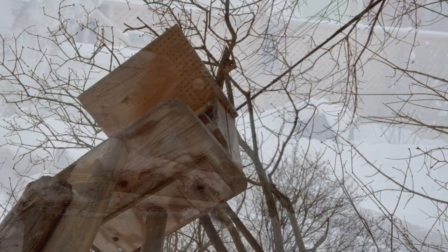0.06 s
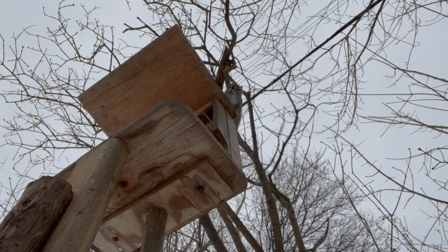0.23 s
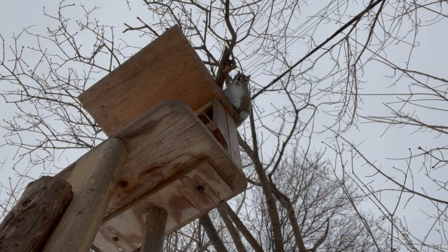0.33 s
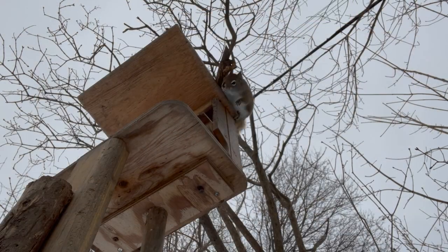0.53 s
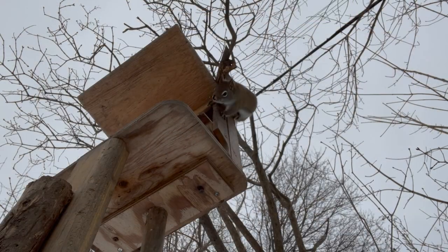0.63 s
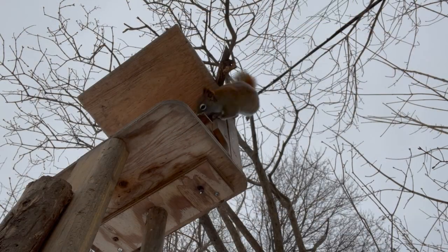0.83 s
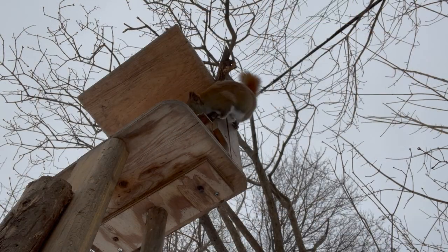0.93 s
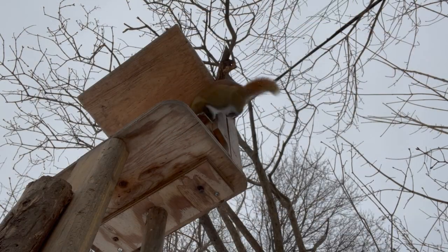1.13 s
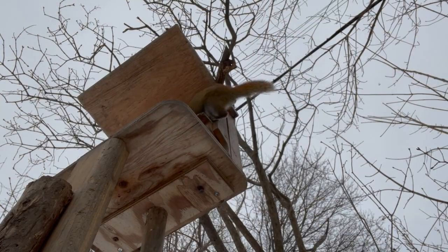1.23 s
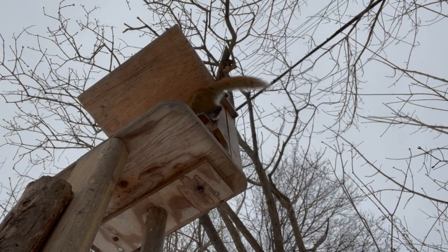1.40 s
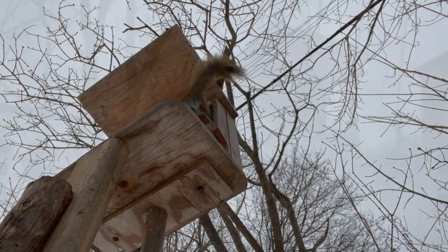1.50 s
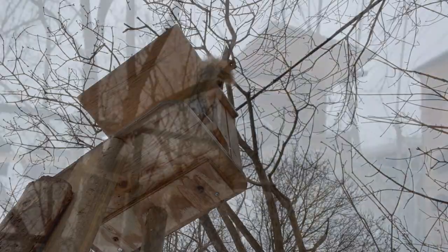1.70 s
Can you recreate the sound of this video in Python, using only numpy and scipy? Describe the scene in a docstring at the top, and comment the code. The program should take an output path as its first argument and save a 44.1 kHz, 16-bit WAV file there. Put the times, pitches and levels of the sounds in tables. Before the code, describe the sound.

A squirrel gives a sharp, high, slightly raspy squeak at 0.2 seconds, a softer one with a light knock at 0.6, and another sharp one at 0.8, each echoing faintly among trees. Its claws scratch lightly on a wooden box throughout, with a quick flurry around 1.2 seconds. A foot knocks hollowly on the boards at 1.5. A quiet distant rumble, hiss and faint hum continue underneath.

```python
"""Among bare trees, a squirrel on a wooden nest box gives two sharp squeaks with a softer one between.
The two sharp whistles leap up, hold and drop; the softer one holds, then drops.
Each has a rasp and a weak voice an octave below.
Its claws scrabble on the wood, and its feet knock on the box and make the boards ring.
A faint high ring fades at the start. The trees echo, over a distant rumble, hiss and faint hum."""
import sys
import numpy as np
from scipy import signal
from scipy.fft import rfft, irfft, next_fast_len
from scipy.io import wavfile
from scipy.ndimage import uniform_filter1d, map_coordinates

SR = 44100
rng = np.random.default_rng(int(sys.argv[2]) if len(sys.argv) > 2 else 0)


def bounce(signal):
    """Save signal as a 16-bit WAV file at the path given by the first command-line argument."""
    frames = np.transpose(np.atleast_2d(signal))
    limited = np.clip(frames, -1, 1)
    pcm = np.round(limited * 32767).astype(np.int16)
    wavfile.write(sys.argv[1], SR, pcm)


N = 77175


def squeaks():
    """Three raspy whistles; the third runs into a short, falling knock on the wood."""
    # three whistles, a table each; the last two rows of the third are the knock:
    # time_s, pitch_hz, level_db, overtones_db, rasp_db (last two against the main tone)
    calls = [
        [(.203, 2774, -59, -22.5, -3), (.2075, 3070, -52.5, -24, -7.5), (.209, 4280, -44, -37, -17.5),
         (.2135, 4440, -36.5, -31, -22.5), (.218, 4830, -39, -24.5, -20.5), (.2235, 5110, -48, -16, -8.5),
         (.2255, 4910, -32, 2, -15.5), (.232, 4798, -23.5, -3, -20.5), (.239, 4880, -26.5, 2.5, -17),
         (.2485, 4714, -26, -3.5, -19), (.2512, 4110, -29, -22, -27), (.2535, 3880, -48, -25, -12)],
        [(.575, 4610, -65, -27, -14), (.5765, 4556, -43, -22, -17.5), (.586, 4543, -40.5, -26, -18),
         (.589, 4584, -42.5, -32, -4.5), (.5935, 4623, -44, -9, -7.5), (.5975, 4080, -40, -43, -20.5),
         (.5995, 3800, -47, -24, 4.5)],
        [(.769, 2910, -62.5, 2.5, -5.5), (.7745, 3066, -55, -0.5, -19.5), (.7765, 3173, -43.5, -18, -15),
         (.7785, 4453, -51.5, -37, -12), (.79, 4588, -37, -38, -24), (.797, 4844, -39.5, -28.5, -33.5),
         (.803, 4845, -35.5, -31, -39.5), (.808, 5060, -42, -25.5, -13.5), (.8132, 5180, -53, -14.5, -3),
         (.8152, 5170, -27.5, -10.5, -20), (.82, 4833, -22.5, -17, -32), (.823, 4794, -32.5, -6, -19.5),
         (.829, 4530, -31.5, -19.5, -21.5), (.832, 1940, -54, -15, -1), (.837, 1090, -56.5, -7.5, -5)],
    ]
    # third harmonic against the second, one per squeak: level_db
    thirds = [-24.5, -10, -11.5]
    # change in the overtones sent to the trees, one per squeak: gain_db
    toward_trees = [-4.5, 11, 7.5]
    # weak tones at 0.5 and 1.5 times the pitch, against the whistle: level_db
    undertones = [-34.5, -23]
    # tone colour of the throat's rasp: pitch_hz, level_db
    rasp = [(1400, -21), (2500, -3), (4600, 6), (5600, -21.5), (6500, -19.5), (7200, -14.5), (8200, -14.5),
            (9500, -3.5), (12500, -20), (14500, -10.5), (16500, -28.5)]
    jitter_share, shakes_per_s, flutter_rad = .0073, 900, .6
    out = np.zeros((2, N))  # the sound sent forward, and the sound sent to the trees
    for rows, third_db, trees_db in zip(calls, thirds, toward_trees):
        hz, level_db, over_db, rasp_db = curves(rows)
        phase = 2 * np.pi * np.cumsum(hz * (1 + jitter_share * wobble(shakes_per_s))) / SR
        third = amp(third_db + 2 * wobble(shakes_per_s)) * np.sin(3 * phase)
        over = np.sqrt(2) * amp(over_db) * (np.sin(2 * phase) + third)
        under = sum(amp(db) * np.sin((k + .5) * phase + flutter_rad * wobble(shakes_per_s))
                    for k, db in enumerate(undertones))
        voice = np.sqrt(2) * (np.sin(phase) + under) + amp(rasp_db) * noise(rasp)
        out += within(rows) * amp(level_db) * np.array([voice + over, voice + amp(trees_db) * over])
    return out


def claws():
    """Claws catch on the wood in short, grainy scratches. Longer ones start more softly."""
    # scratches: start_s, level_db, brightness_db_per_octave, fade_s
    scratches = [(.1, -65.5, 1, 0.072), (.268, -53.5, -7.5, .04), (.464, -73, 12, 0.041),
                 (.498, -76, 15, .04), (0.551, -61, -3.5, 0.15), (0.589, -43.5, -0.5, .024),
                 (0.614, -49.5, -1.5, 0.067), (0.8385, -45, -11, .032), (0.893, -56.5, 0, 0.067),
                 (1.004, -75, 7, .04), (1.051, -69, -2, .035), (1.117, -63.5, 2.5, 0.028),
                 (1.156, -54, -1, 0.017), (1.1778, -44.5, -6.5, 0.019), (1.1971, -51.5, 0, 0.026),
                 (1.2058, -49, 2.5, 0.019), (1.2156, -52.5, 3, 0.027), (1.226, -53, 1, 0.021),
                 (1.2339, -57.5, 0.5, .039), (1.354, -63.5, 10.5, .031), (1.43, -69.5, -6.5, .08)]
    # tone colour of a claw on wood: pitch_hz, level_db
    scrape = [(1500, -11), (3800, 2), (5500, 1.5), (6700, -7), (8700, -4.5), (10500, -4.5), (12300, -10),
              (15000, -6), (16500, -18.5)]
    rise_share, grain_db = .035, 3.5
    out = np.zeros(N)
    for start_s, level_db, brightness, fade_s in scratches:
        colour = lambda hz: amp(along(scrape, hz) + brightness * np.log2(np.maximum(hz, scrape[0][0])))
        grains = rng.standard_normal(N) * amp(grain_db * wobble(1600))
        envelope = strike(start_s, rise_share * fade_s, fade_s)
        out += amp(level_db) * envelope * unit(filtered(grains, colour))
    return out


def knocks():
    """Each footfall ticks, then swells into a round thud that sinks to the boards' own notes."""
    # feet on the box: start_s, level_db, brightness_db_per_octave, ring_share (scales the thud's times)
    footfalls = [(.571, -36, 7, 0.408), (0.621, -44.5, 11.5, 0.69), (1.48, -28, -3.5, 1)]
    # notes the boards ring with: pitch_hz, level_db, full_fade_s
    notes = [(408.3, -20.5, 0.14), (438.6, 0, 0.053), (862, -1, 0.031), (955, -19, 0.033),
             (1780, -34, 0.074)]
    # tone colour of the tick: pitch_hz, level_db
    tick_colour = [(2300, -14), (3100, 5), (4400, 7.5), (5600, -19), (8000, -11.5), (12000, -22)]
    sharp_hz, full_settle_s, full_rise_s, tick_db = 583, .0028, .0056, -26
    t, out = np.arange(N) / SR, np.zeros(N)
    for start_s, level_db, brightness, ring_share in footfalls:
        age = np.maximum(t - start_s, 0)
        settle_s = full_settle_s * ring_share
        extra_cycles = sharp_hz * settle_s * (1 - np.exp(-age / settle_s))  # notes start high, then sink
        boards = np.zeros(N)
        for hz, note_db, full_fade_s in notes:
            gain = 2 * amp(note_db + brightness * np.log2(hz / notes[1][0]))
            envelope = strike(start_s, full_rise_s * ring_share, full_fade_s * ring_share)
            boards += gain * envelope * np.sin(2 * np.pi * (hz * age + extra_cycles))
        tick = amp(tick_db) * noise(tick_colour) * strike(start_s, rise_s=.00054, fade_s=.02)
        out += amp(level_db) * (boards + tick)
    return out


def from_the_box(sound):
    """Sound from the box's direction reaches left and right with different timing and strength."""
    # how far left runs ahead of right: pitch_hz, lead_rad
    lead = [(700, .6), (2700, -.9), (4800, -2.3), (5500, -1.9), (6100, -2.7), (7200, -1.3), (8500, 0),
            (12300, 3.1), (15500, 6.2)]
    # how much louder left is than right: pitch_hz, level_db
    balance = [(500, -2.5), (1200, 0), (2700, -6), (4600, .7), (5200, .5), (7400, -5), (9500, 0)]
    sides = np.array([[.5], [-.5]])
    response = lambda hz: amp(sides * along(balance, hz)) * np.exp(1j * sides * along(lead, hz))
    return filtered(sound, response)


def tree_echo(sound):
    """Sound scatters quickly off the box, and a longer, weak echo returns from the branches."""
    # how long the branches echo: pitch_hz, fade_s
    fades = [(400, 0.44), (4800, 0.31), (10000, 0.21), (15000, 0.24)]
    branches_db, scatter_db, scatter_fade_s = -24.5, -18, .067
    hz, t, bands = signal.stft(rng.standard_normal((2, SR // 2)), SR, nperseg=256)
    tail = signal.istft(bands * fade(t, along(fades, hz)[:, None]), SR, nperseg=256)[1]
    early = rng.standard_normal(tail.shape) * fade(np.arange(tail.shape[1]) / SR, scatter_fade_s)
    branches = amp(branches_db) * tail / np.linalg.norm(tail[0])
    scatter = amp(scatter_db) * early / np.linalg.norm(early[0])
    return signal.fftconvolve(sound[None], branches + scatter, axes=1)[:, :N]


def fading_ring():
    """Like the echo of an earlier call: a high haze dies quickly and a thin tone sinks below it."""
    # the thin tone: time_s, pitch_hz, level_db
    tone = [(.02, 4210, -73), (.12, 4135, -75.5), (.21, 4090, -80)]
    haze_hz, haze_db, fall_db_per_s, octave_db = 4400, -71, 85.5, -11
    t = np.arange(N) / SR
    hz, level_db = curves(tone)
    wide = lambda phase, width_hz: np.array([blurred_tone(phase, width_hz) for _ in range(2)])
    phase = 2 * np.pi * haze_hz * t
    haze = wide(phase, width_hz=920) + amp(octave_db) * wide(2 * phase, width_hz=920)
    thin = wide(2 * np.pi * np.cumsum(hz) / SR, width_hz=120)
    return amp(haze_db - fall_db_per_s * t) * haze + within(tone) * amp(level_db) * thin


def distant_air():
    """A far rumble and a thin hiss waver gently together."""
    # loudness of the air: time_s, level_db
    levels = [(0, -54), (.15, -53.5), (1.25, -54), (1.75, -56.5)]
    # tone colour of the rumble: pitch_hz, level_db
    rumble = [(25, -23.5), (50, -2.5), (120, -6), (170, -13.5), (240, -10), (340, -10.5), (480, -9.5),
              (700, -6.5), (1000, -12.5), (1400, -23), (4500, -63.5)]
    # tone colour of the hiss: pitch_hz, level_db
    hiss = [(1500, 0.5), (2400, -5.5), (4000, -14), (7000, -17.5), (10500, -19), (12500, -31.5),
            (14500, -20), (16000, -38)]
    hiss_db = -26.5
    level_db, = curves(levels)
    gain = amp(level_db + .63 * wobble(5.5))
    return gain * (stereo_noise(rumble, low_hz=15) + amp(hiss_db) * stereo_noise(hiss, low_hz=1500))


def hum():
    """A faint, far tone wavers in pitch and swells twice."""
    # loudness of the hum: time_s, level_db
    levels = [(0, -69.5), (.12, -63), (.55, -69), (1.15, -58), (1.42, -66.5), (1.65, -86.5)]
    pitch_hz, waver_hz = 296.4, 1.4
    level_db, = curves(levels)
    gain = np.sqrt(2) * amp(level_db + wobble(2.2))
    return gain * np.sin(2 * np.pi * np.cumsum(pitch_hz + waver_hz * wobble(9.9)) / SR)


def drone():
    """A low, uneven throb in the far rumble slowly dies down."""
    pitch_hz, start_db, fall_db_per_s = 66.4, -60.5, 4.5
    t = np.arange(N) / SR
    return amp(start_db - fall_db_per_s * t) * blurred_tone(2 * np.pi * pitch_hz * t, width_hz=20)


def stereo_noise(spectrum, low_hz):
    """Noise of strength 1, alike on both sides in the bass and weaker below low_hz."""
    # how alike left and right are: pitch_hz, likeness (1 = the same)
    likeness = [(60, 0.89), (130, 0.84), (300, 0.4), (700, 0), (10000, 0.06)]
    spread = lambda hz: np.arccos(np.clip(along(likeness, hz), -1, 1)) / 2
    colour = lambda hz: amp(along(spectrum, hz)) * hz ** 2 / (hz ** 2 + low_hz ** 2)
    response = lambda hz: colour(hz) * [np.cos(spread(hz)), np.sin(spread(hz))]
    mid, side = filtered(rng.standard_normal((2, N)), response)
    return unit(np.array([mid + side, mid - side]))


def noise(spectrum):
    """Noise of strength 1 with the given tone colour."""
    return unit(filtered(rng.standard_normal(N), lambda hz: amp(along(spectrum, hz))))


def blurred_tone(phase, width_hz):
    """A tone smeared into a narrow band of noise."""
    return wobble(width_hz) * np.sin(phase) + wobble(width_hz) * np.cos(phase)


def strike(start_s, rise_s, fade_s):
    """The loudness of a blow: a rounded rise, then a fade."""
    age = np.maximum(np.arange(N) / SR - start_s, 0)
    return (1 - np.exp(-(age / rise_s) ** 2)) * fade(age, fade_s)


def fade(t, fade_s):
    """A gain that falls 60 dB every fade_s seconds."""
    return np.exp(-np.log(1000) * t / fade_s)


def amp(db):
    """Turn decibels into a gain."""
    return 10 ** (np.asarray(db) / 20)


def unit(x):
    """Scale a sound to an average strength (rms) of 1."""
    return x / np.sqrt(np.mean(x ** 2) + 1e-20)


def along(points, hz):
    """Look up a (pitch_hz, value) table, with octaves evenly spaced."""
    pitches, values = np.transpose(points)
    return np.interp(np.log(hz + 1), np.log(pitches + 1), values)


def curves(rows):
    """One value per sample for each column after the time."""
    times, *columns = np.transpose(rows)
    return [np.interp(np.arange(N) / SR, times, column) for column in columns]


def within(rows):
    """Switch softly on for the time that a table covers."""
    t = np.arange(N) / SR
    return uniform_filter1d(((t >= rows[0][0]) & (t <= rows[-1][0])) * 1., size=40)


def wobble(rate):
    """A smooth curve through `rate` random points a second."""
    return map_coordinates(rng.standard_normal(int(N * rate / SR) + 4), [np.arange(N) * rate / SR])


def filtered(x, response):
    """Change the strength and timing of each pitch in x by response(hz)."""
    size = next_fast_len(N + SR // 2)
    return irfft(rfft(x, size) * response(np.fft.rfftfreq(size, 1 / SR)), size)[..., :N]


def scene():
    """The squirrel on its box, the echo of the trees and the far background."""
    forward, to_trees = squeaks() + claws() + knocks()
    squirrel = from_the_box(forward) + tree_echo(to_trees)
    return squirrel + fading_ring() + distant_air() + hum() + drone()


def record(dry):
    """Cut off the very highest treble."""
    top_hz = 16600
    return filtered(dry, lambda hz: hz < top_hz)


dry = scene()
out = record(dry)
bounce(out)
```